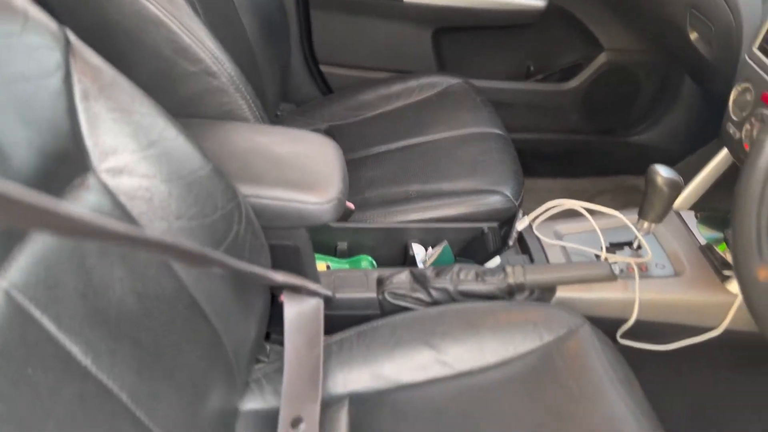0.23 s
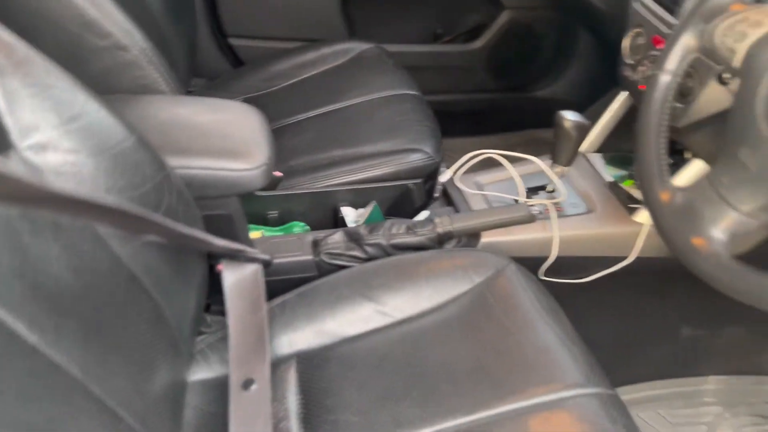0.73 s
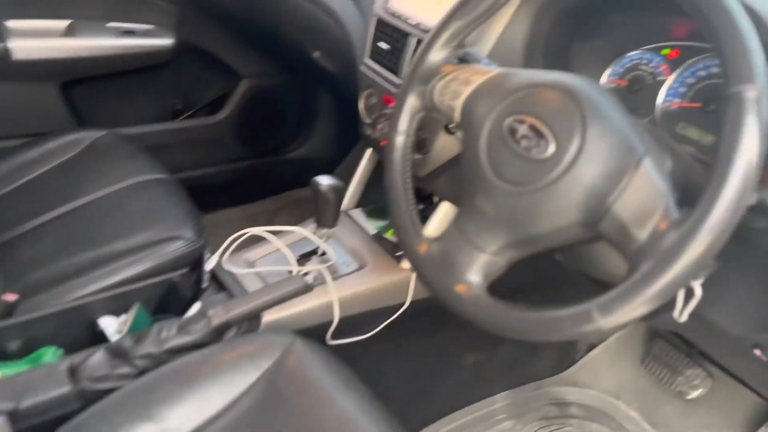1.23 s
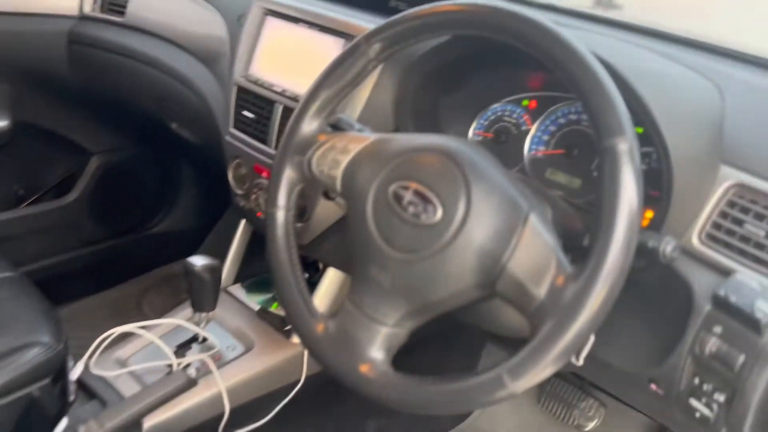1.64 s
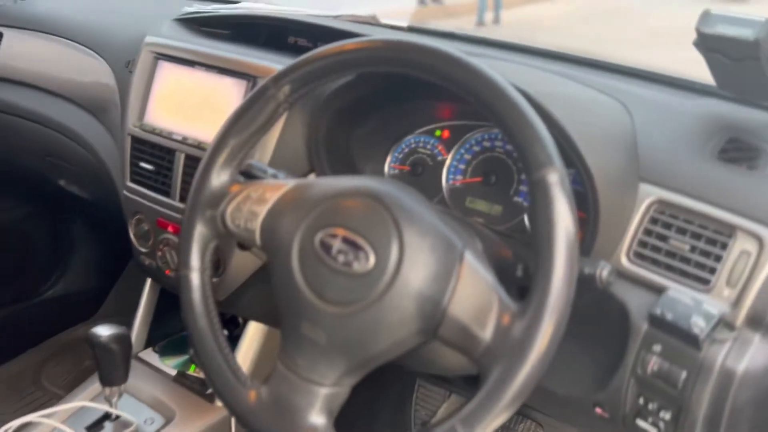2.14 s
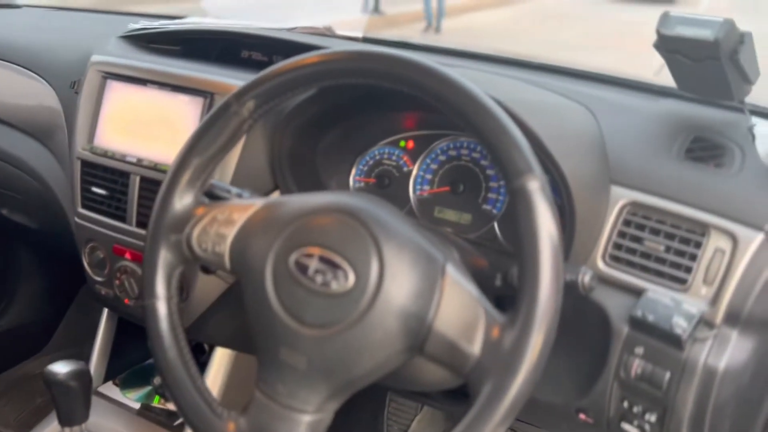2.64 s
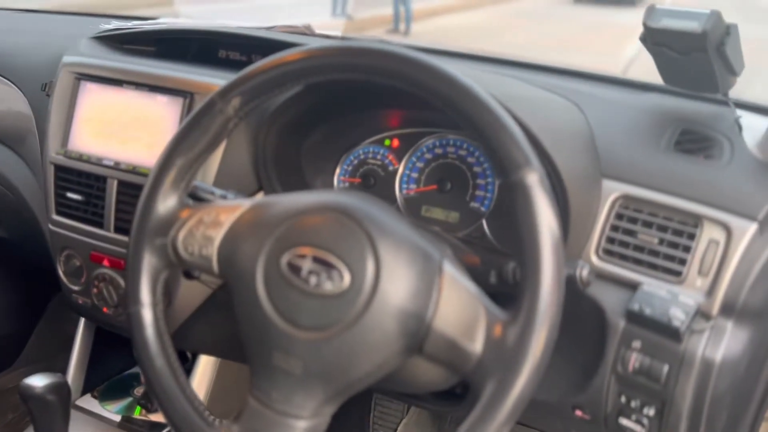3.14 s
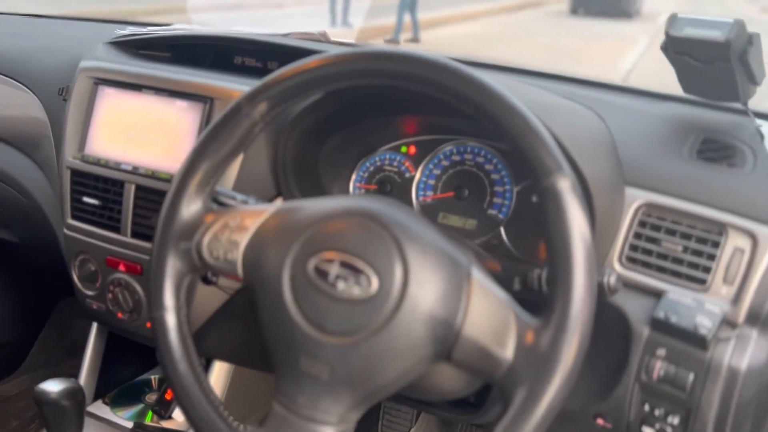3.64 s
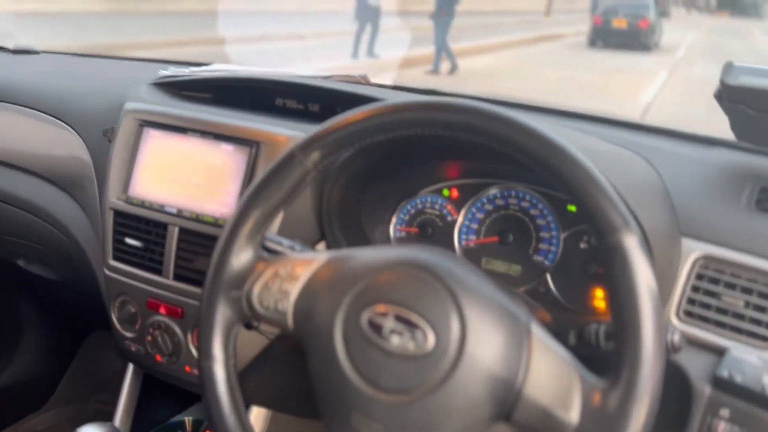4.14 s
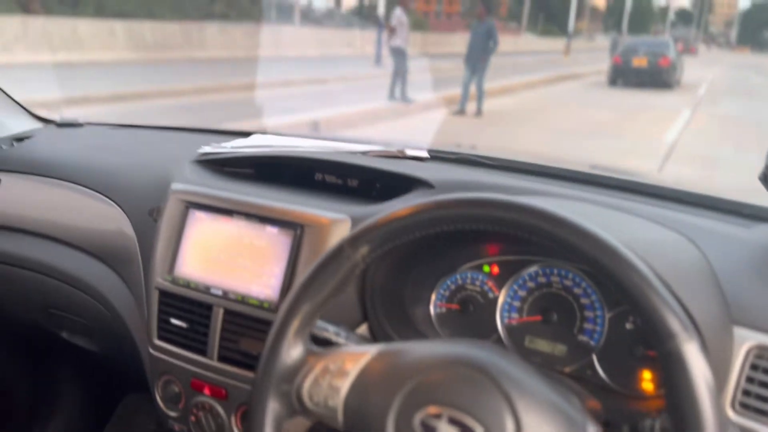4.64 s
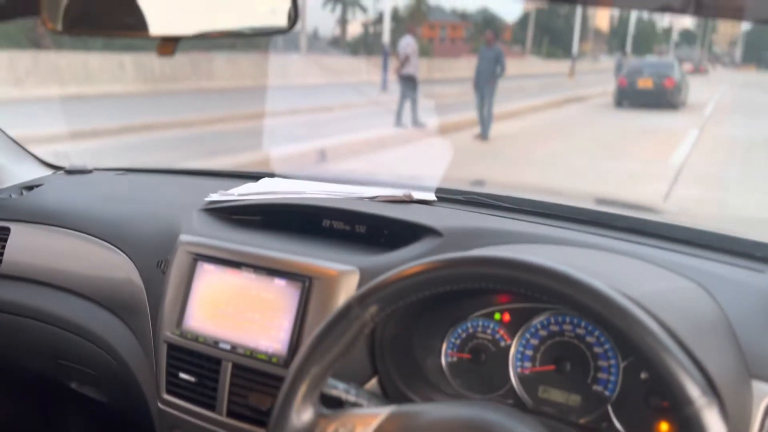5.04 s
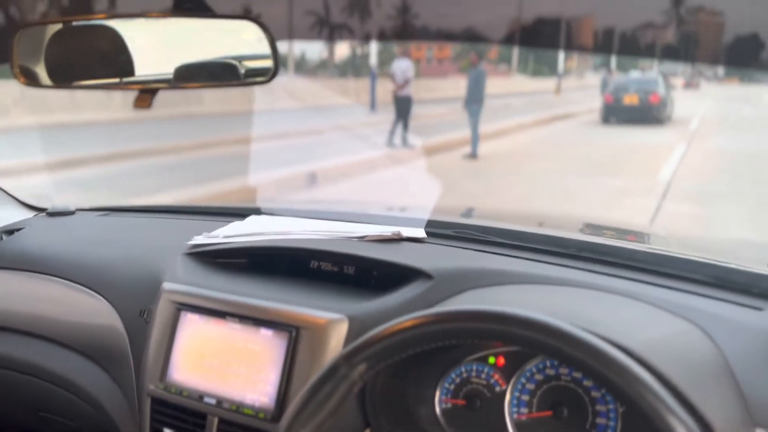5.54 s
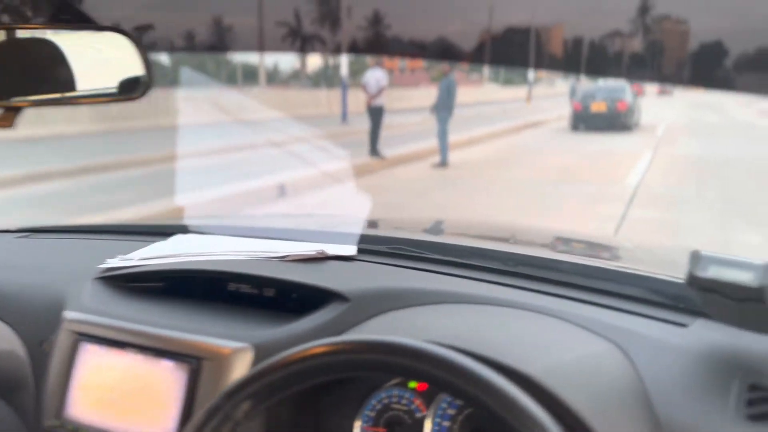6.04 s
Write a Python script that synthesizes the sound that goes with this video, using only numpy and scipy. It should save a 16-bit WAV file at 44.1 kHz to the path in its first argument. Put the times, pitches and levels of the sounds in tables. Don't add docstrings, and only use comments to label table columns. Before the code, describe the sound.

Inside an open-doored car, a lumpy idle hums and hisses steadily; wind buffets the microphone early, plastic ticks midway, a distant horn ends it.

```python
import sys
import numpy as np
from scipy import signal
from scipy.fft import rfft, irfft, next_fast_len
from scipy.io import wavfile
from scipy.ndimage import uniform_filter1d, map_coordinates

SR = 44100
rng = np.random.default_rng(int(sys.argv[2]) if len(sys.argv) > 2 else 0)


def pcm_store(signal):
    levels = np.round(np.clip(np.atleast_2d(signal), -1, 1) * 32767)
    wavfile.write(sys.argv[1], SR, levels.astype(np.int16).T)


def volts(x):
    e = np.asarray(x, float) / 20
    return 10 ** e


N = 277389

# time in seconds, firings per second in Hz.
FIRING_RATE = [(0, 26.6), (.75, 26.68), (1.25, 26.9), (2, 26.52), (2.75, 26.07), (3.2, 25.58),
               (3.55, 25.84), (4.5, 25.4), (4.85, 25.15), (5.75, 24.92), (6.29, 24.98)]
# multiple of the four-stroke cycle rate, level in dB.
EXHAUST_ORDERS = [(4, -41), (7, -48.5), (8, -51), (9, -55), (10, -57), (12, -51), (15, -51), (16, -43),
                  (17, -51), (18, -56), (19, -56), (20, -56), (23, -59), (25, -60), (29, -61), (40, -63)]
# time in seconds, level in dB.
EXHAUST_LOAD = [(0, -4.5), (2, 0), (4.5, -1.5), (6.29, -4)]
# time in seconds, level in dB.
FAN_LEVEL = [(0, -41), (1.4, -42), (3.4, -36.5), (5.6, -38.5), (6.29, -37.5)]
# frequency in Hz, gain in dB.
BRACKET_GAIN = [(1070, -9), (1105, -9), (1125, -7.5), (1138, 0), (1152, -.5), (1175, -3)]
# frequency in Hz, gain in dB.
COVER_GAIN = [(595, -5), (606, -1), (618, 0), (632, -2), (642, -4.5)]
# frequency in Hz, density in dB per Hz.
BRACKET_RING = [(960, -46), (1060, -7), (1120, 2.5), (1180, -4), (1260, -12), (1400, -45)]
# place in the cycle from 0 to 1, level in dB, fade in seconds.
VALVE_PUFFS = [
    (0.62, 6.5, 0.029),
    (0.9, 3, 0.035),
    (0.13, -0.5, 0.045),
    (0.33, -6.5, 0.029),
]
# frequency in Hz, density in dB per Hz.
RUMBLE_COLOUR = [(20, -32), (38, -5), (46, -4.5), (50, -1), (60, -1), (75, -9), (95, -1), (125, -6.5),
                 (170, -9), (230, -16), (320, -21), (500, -59)]
BODY_COLOUR = [(110, -52), (180, 2), (214, -10), (264, 0), (354, -5.5), (500, -10), (620, -10), (720, -14),
               (844, -12), (980, -11), (1270, -14.5), (1600, -22.5), (2100, -39)]
HISS_COLOUR = [(900, -25), (1300, -3.5), (2000, 3.5), (3000, -5), (4500, -12), (6200, -13), (7000, -22),
               (8500, -48)]
VALVE_COLOUR = [(5500, -9.5), (7000, -9), (8600, 0), (9800, -4.5), (11000, -37)]
SPARK_COLOUR = [(8800, -30), (9900, 0), (11000, -1), (11900, -3.5), (12900, -10), (14200, -6), (15700, -6),
                (16000, -60)]
# time in seconds, level in dB.
DOOR_OPENING = [(0, -1), (.5, -1), (1.2, -1), (1.8, -2), (2.3, -2), (2.9, -2.5), (3.4, -2.5), (4, -3.5),
                (4.6, -4), (5.1, -4.5), (5.8, -4), (6.29, -2.5)]
# frequency in Hz, likeness from 0 to 1.
PORT_LIKENESS = [(30, 0.44), (60, 1), (130, 0.85), (300, 0.94), (500, 0.29), (700, 0.036), (1400, 0.2),
                 (3000, 0.033), (6800, 0.029), (8500, 0.85), (11000, 1)]
# peak in seconds, pitch in Hz, level in dB, rise and fall in dB per second.
WHISTLE_SWELLS = [
    (1.1, 5900, -65.5, 22, 14),
    (5.6, 5710, -75, 22, 1),
]
# start in seconds, peak in dB, starting pitch in Hz, length in cycles.
GUST_EDDIES = [(.1, -27, 70, 2), (.17, -24.5, 100, 3.5), (.238, -23, 130, 2.5), (.268, -26, 90, 2),
               (0.366, -24, 149, 2.9), (0.399, -24, 72, 2.9), (0.534, -9.5, 94.5, 1.37),
               (0.578, -13, 92, 3), (0.667, -8.5, 135, 2.2), (0.684, -17.5, 66.4, 2.9),
               (0.731, -18, 74.5, 1.8), (0.762, -21.5, 88.5, 2.4), (0.849, -22, 80, 1.4),
               (.883, -22, 215, 3.8), (.896, -13.5, 102, 2.1), (1.023, -24, 108, 2), (1.086, -20, 85, 3.4),
               (1.144, -22.5, 97, 2.2), (1.219, -21, 98, 2)]
# start in seconds, level in dB, slip length in seconds, centre in Hz, L-R in dB.
TRIM_SCRAPES = [
    (0.343, -43.5, 0.004, 2100, 12),
    (0.351, -45, 0.012, 2200, 1),
    (0.3665, -42, 0.005, 2200, -2),
    (3.438, -45, 0.0013, 3300, 0),
    (3.488, -41, .0005, 3800, 3),
    (3.490, -36, 0.003, 3300, -2),
    (3.503, -43, 0.002, 3400, 8),
    (3.522, -32, 0.0015, 3600, -1),
]
# start in seconds, level in dB, slip length in seconds, centre in Hz, L-R in dB.
TRIM_PINGS = [
    (.339, -43, .008, 3600, -4),
    (0.687, -51, .002, 2200, -3),
    (.694, -43, 0.005, 3400, -4),
]
# frequency as a share of the centre, density in dB per Hz.
TRIM_COLOUR = [(.2, -40), (.4, -10), (.7, -5.5), (1.3, -2), (2, -8), (3.6, -16.5), (6, -25)]
# frequency in Hz, L-R in dB.
PORT_BALANCE = [(60, 0.9), (250, 0), (600, -5), (1150, -4.5), (1500, -0.5), (2200, -4), (3300, -1),
                (5500, 9), (6300, 10), (7000, 1.5), (8600, -2), (10000, 0.5)]
# frequency in Hz, half the lead in radians.
PORT_LEAD = [(30, 0.0089), (300, 0.27), (700, 0), (1400, 0.53), (2500, 0.97), (6000, 0.042)]


def unit(x):
    return x / np.sqrt(np.mean(x ** 2) + 1e-20)


def along(points, hz):
    f, v = np.transpose(points)
    return np.interp(np.log(hz + 1), np.log(f + 1), v)


def curves(rows):
    s, *cols = np.transpose(rows)
    return [np.interp(np.arange(N) / SR, s, c) for c in cols]


def step(at_s, width_s):
    return .5 + .5 * np.tanh((np.arange(N) / SR - at_s) / width_s)


def wobble(rate):
    knots = rng.standard_normal(int(N * rate / SR) + 4)
    return map_coordinates(knots, [np.arange(N) * rate / SR])


def filtered(x, response):
    m = next_fast_len(N + 8192)
    return irfft(rfft(x, m) * response(np.fft.rfftfreq(m, 1 / SR)), m)[..., :N]


def tone(turns, db, shake, rate):
    size = np.sqrt(2) * volts(db + 3.5 * shake * wobble(rate))
    return size * np.cos(2 * np.pi * turns + shake * wobble(rate))


def rush(spectrum, patchy_db):
    z = signal.stft(rng.standard_normal((2, N)), nperseg=512)[2]
    field = uniform_filter1d(rng.standard_normal(z.shape[1:]), size=6, axis=0)
    field = uniform_filter1d(field, size=12, axis=1)
    pair = signal.istft(z * volts(patchy_db * unit(field)), nperseg=512)[1][:, :N]

    def mid_side(hz):
        turn = np.arccos(np.clip(along(PORT_LIKENESS, hz), -1, 1)) / 2
        return volts(along(spectrum, hz)) * [np.cos(turn), np.sin(turn)]

    mid, side = filtered(pair, mid_side)
    return unit(np.array([mid + side, mid - side]))


def exhaust(cycle):
    blow = cycle - .28
    orders = sum(tone(k * blow, db, shake=.05 * np.sqrt(k), rate=3) for k, db in EXHAUST_ORDERS)
    return volts(curves(EXHAUST_LOAD)[0]) * orders


def whine(firings, firing_hz):
    poles, teeth = 42.82, 24
    idle_db = -12 * (1 - step(1.08, .07))
    pole_db = -54 + along(BRACKET_GAIN, poles * firing_hz) + idle_db
    upper_db = -58 + 1.35 * along(BRACKET_GAIN, (poles + 1) * firing_hz)
    belt_db = -62 + along(COVER_GAIN, teeth * firing_hz)
    main = tone(poles * firings, pole_db, shake=.28, rate=12)
    upper = tone((poles + 1) * firings, upper_db, shake=.5, rate=12)
    lower = sum(tone((poles - k) * firings, pole_db - 13, shake=.7, rate=12) for k in (1, 2))
    ring = volts(.5 * (pole_db + upper_db) + 2) * rush(BRACKET_RING, patchy_db=1.5)
    belt = tone(teeth * firings, belt_db, shake=.35, rate=12)
    return main + upper - lower + ring + belt


def fan():
    hz = 74 - .35 * np.arange(N) / SR
    return tone(np.cumsum(hz) / SR, curves(FAN_LEVEL)[0], shake=0.13, rate=4.73)


def puffs(cycle, cycle_hz):
    total = np.full(N, .45)
    for place, db, fade_s in VALVE_PUFFS:
        turn, since = np.divmod(cycle - place, 1)
        strength = volts(db + 1.6 * rng.standard_normal(60))[turn.astype(int)]
        age_s = since / cycle_hz
        attack = 1 - np.exp(-age_s / 0.0066)
        total += strength * np.exp(-age_s / fade_s) * attack
    return unit(total)


def noise(beat):
    door_db = curves(DOOR_OPENING)[0]
    draught_db = 8.5 * (1 - step(1.17, 0.38))
    low_db = -41.5 + 0.083 * door_db + draught_db + 1.2 * wobble(8.9)
    body_db = -43.5 + 1.23 * door_db + 0.85 * wobble(5.38)
    hiss_db = -51.5 + 0.96 * door_db + 0.069 * wobble(3.0)
    valves_db = -62 + 0.57 * door_db
    spark_db = -68.5 + 1.65 * door_db + 0.93 * wobble(4.05)
    low = volts(low_db) * rush(RUMBLE_COLOUR, patchy_db=0.0)
    body = volts(body_db) * beat ** 0.068 * rush(BODY_COLOUR, patchy_db=1.1)
    hiss = volts(hiss_db) * beat ** 0.46 * rush(HISS_COLOUR, patchy_db=1.54)
    valves = volts(valves_db) * beat ** 1.05 * rush(VALVE_COLOUR, patchy_db=1.6)
    spark = volts(spark_db) * beat ** 1.9 * rush(SPARK_COLOUR, patchy_db=-2.7)
    return low + body + hiss + valves + spark


def gust():
    out, t = np.zeros((2, N + SR)), np.arange(SR // 8) / SR
    for s, db, hz, cycles in GUST_EDDIES:
        skew = .17 * rng.choice([-1, 1]) * np.array([[1], [-1]])
        u = t * hz
        swell = (u / (0.45 * cycles)) * np.exp(1 - u / (0.4 * cycles))
        push = np.sin(2 * np.pi * 4 * np.log(1 + 0.297 * u) + skew)
        out[:, round(s * SR):][:, :len(t)] += volts(db) * swell ** 1.41 * push
    return out[:, :N]


def ticks(slips, narrow):
    out, t = np.zeros((2, N + SR)), np.arange(4096) / SR
    f = np.fft.rfftfreq(len(t), 1 / SR)
    for s, db, length, hz, pan_db in slips:
        slip = volts(-60 * np.maximum(t - length, 0) / .008)
        cabin = volts(-13 - 60 * t / .12)
        spikes = rng.standard_normal(len(t)) * rng.standard_normal(len(t))
        grit = spikes + .7 * rng.standard_normal((2, len(t)))
        colour = volts(narrow * along(TRIM_COLOUR * np.array([hz, 1]), f))
        crack = irfft(rfft((slip + cabin) * grit) * colour)
        level = volts(db + 6 + np.array([[pan_db], [-pan_db]]) / 2)
        out[:, round(s * SR):][:, :len(t)] += level * crack / np.abs(crack).max()
    return out[:, :N]


def whistle():
    t = np.arange(N) / SR
    total = np.zeros(N)
    for s, hz, db, rise, fall in WHISTLE_SWELLS:
        drop_db = np.maximum(rise * (s - t), fall * (t - s))
        total += tone(hz * t, db - drop_db, shake=1.4, rate=110)
    return total


def horn():
    t = np.arange(N) / SR
    start_s, attack_s, hold_s = 6.185, 0.018, 0.047
    db = -54.5 - 466 * np.maximum(t - start_s - attack_s - hold_s, 0)
    partials = tone(552 * t, db, shake=0.12, rate=28) + tone(276 * t, db - 8, shake=.1, rate=19)
    return step(start_s, attack_s / 2) * partials


def scene():
    firing_hz = curves(FIRING_RATE)[0]
    cycle = np.cumsum(firing_hz) / SR / 4
    tones = exhaust(cycle) + whine(4 * cycle, firing_hz) + fan() + whistle() + horn()
    trim = ticks(TRIM_SCRAPES, narrow=1.3) + ticks(TRIM_PINGS, narrow=3.6)
    return tones + noise(puffs(cycle, firing_hz / 4)) + gust() + trim


def low_pass(x):
    return signal.sosfilt(signal.butter(12, 17110, fs=SR, output="sos"), x)


def record(dry):
    def ports(hz):
        lead = np.pi * .000282 * (hz - 8400) * np.clip(hz / 7000, 0, 1) ** 2 + along(PORT_LEAD, hz)
        balance = volts(along(PORT_BALANCE, hz) / 2 * [[1], [-1]])
        return balance * np.exp(1j * lead * [[-1], [1]]) * (hz < 15780)

    return low_pass(filtered(dry, ports))


dry = scene()
out = record(dry)
pcm_store(out)
```